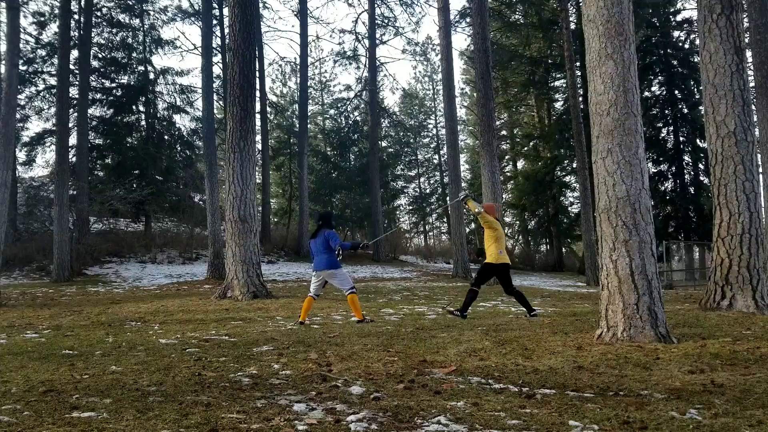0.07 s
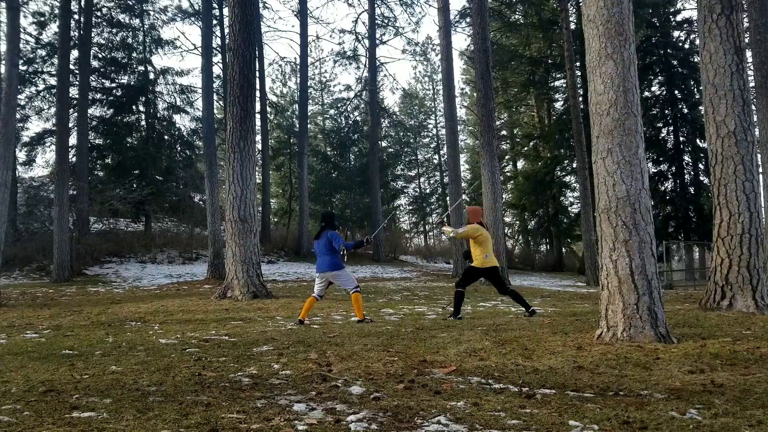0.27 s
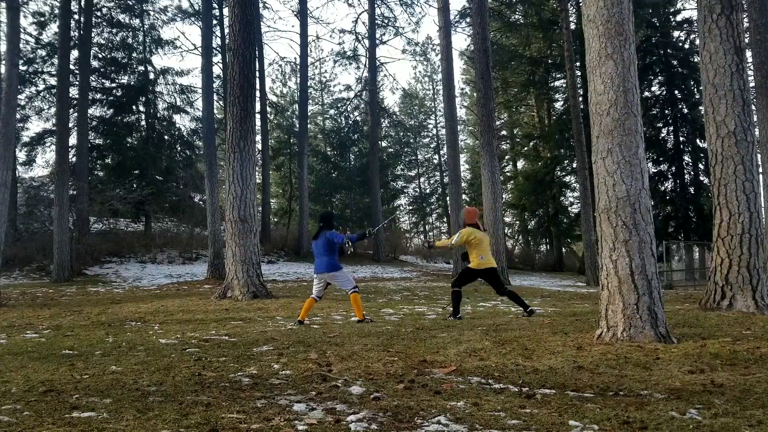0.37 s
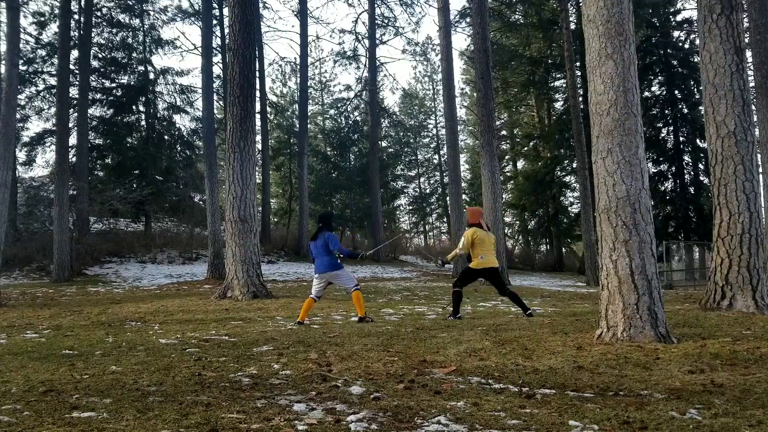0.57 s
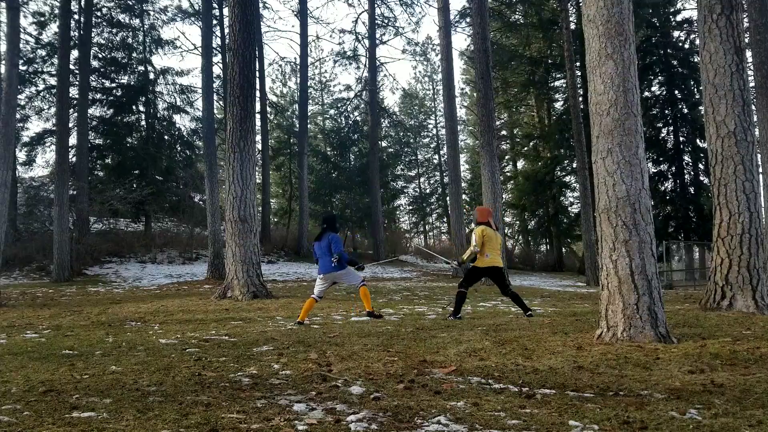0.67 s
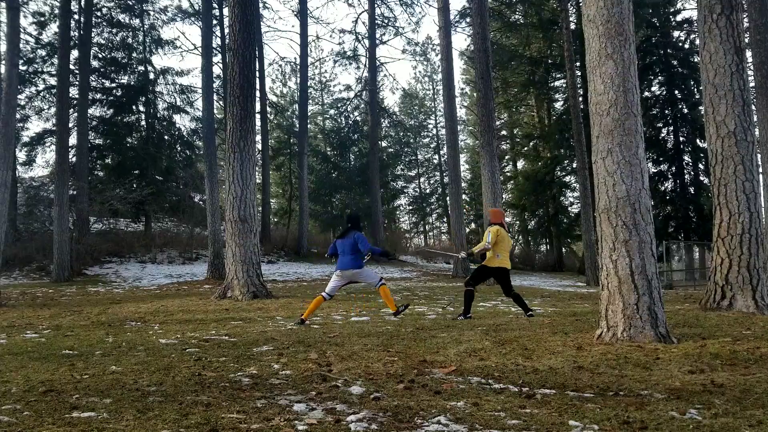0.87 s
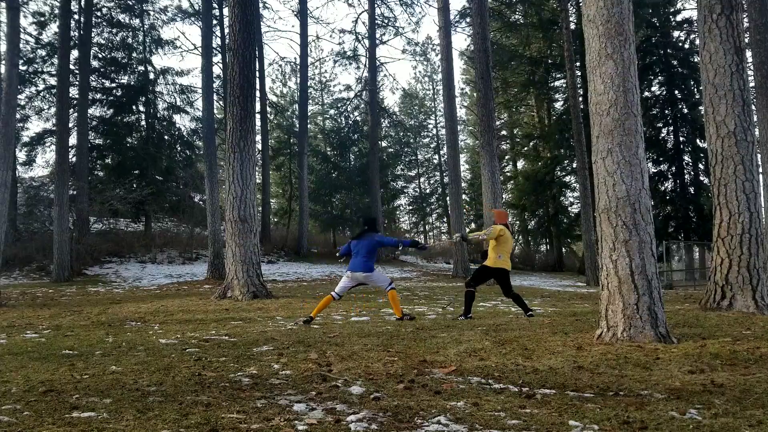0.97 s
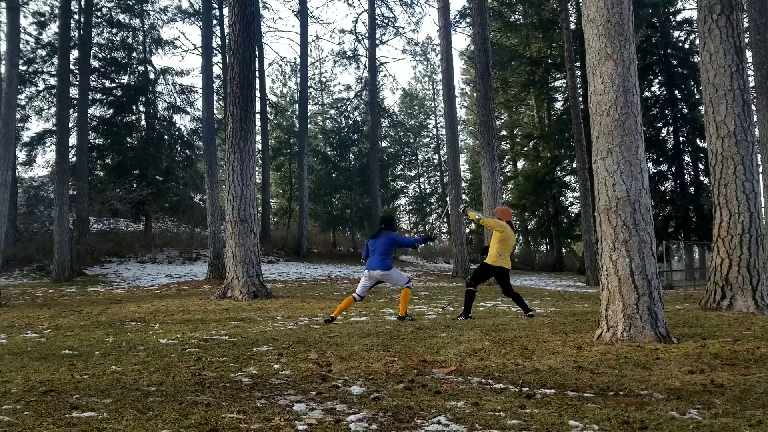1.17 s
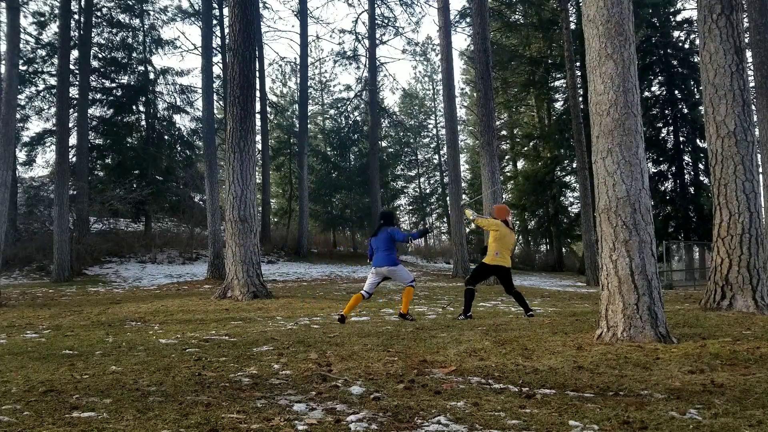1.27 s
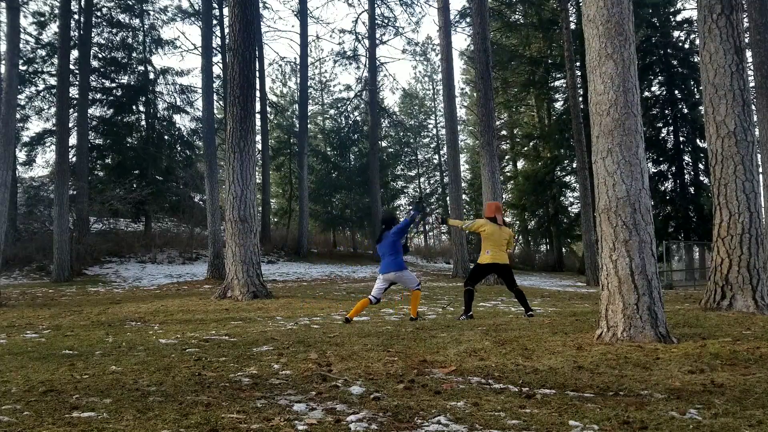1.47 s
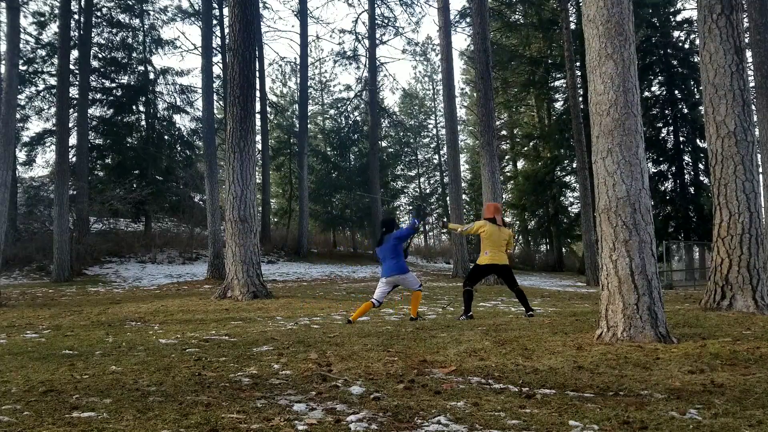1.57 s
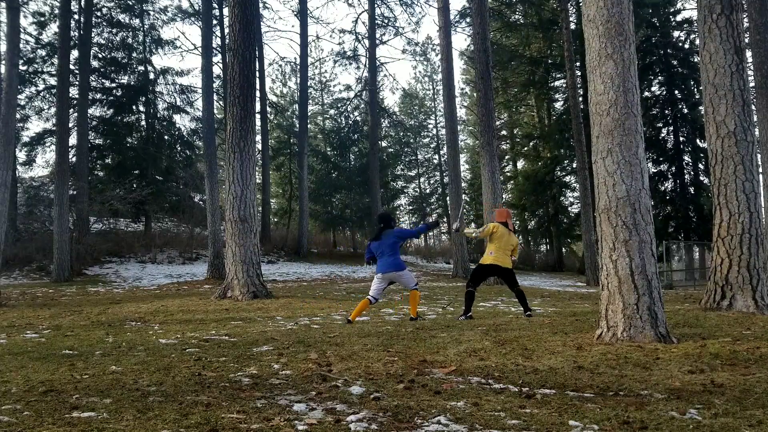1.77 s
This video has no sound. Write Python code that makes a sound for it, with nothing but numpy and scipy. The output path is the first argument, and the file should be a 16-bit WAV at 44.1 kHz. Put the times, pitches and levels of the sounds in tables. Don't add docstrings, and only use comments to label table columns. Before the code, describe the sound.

Blunt steel swords clash outdoors: one hard ringing clack, a faint tap, then a rapid clattering bind, with dull footfalls on turf, small gear ticks, a soft woodland tail and low traffic rumble, heard from several metres.

```python
import sys
import numpy as np
from scipy import signal
from scipy.fft import rfft, irfft, next_fast_len
from scipy.io import wavfile
from scipy.ndimage import uniform_filter1d, map_coordinates

SR = 44100
rng = np.random.default_rng(int(sys.argv[2]) if len(sys.argv) > 2 else 0)


def persist_wave(psi):
    counts = np.round(np.clip(psi, -1, 1) * 32767).astype(np.int16)
    wavfile.write(sys.argv[1], SR, np.atleast_2d(counts).T)


def voltage_ratio(decibels):
    exponent = np.asarray(decibels, float) / 20
    return 10 ** exponent


N = 81585


def unit(x):
    return x / np.sqrt(np.mean(x ** 2) + 1e-20)


def along(points, hz):
    f, value = np.transpose(points)
    return np.interp(np.log(hz + 1), np.log(f + 1), value)


def wobble(rate):
    knots = rng.standard_normal(int(N * rate / SR) + 4)
    return map_coordinates(knots, [np.arange(N) * rate / SR])


def filtered(x, response):
    m = next_fast_len(x.shape[-1] + 8192)
    spectrum = rfft(x, m) * response(np.fft.rfftfreq(m, 1 / SR))
    return irfft(spectrum, m)[..., :x.shape[-1]]


def add(track, sound, s):
    at = round(s * SR)
    track[at:at + len(sound)] += sound[:len(track) - at]


def ports(x, lean, lead=((1, 0), (2, 0))):
    side = np.array([[.5], [-.5]])
    return filtered(x, lambda hz: voltage_ratio(side * along(lean, hz)) * np.exp(1j * side * along(lead, hz)))


def swell(t, length):
    return t / length * 3 * np.exp(1 - t / length * 3)


# f/Hz, level/dB per Hz
SNAP_COLOUR = [(200, -40), (600, -11), (1400, -4.5), (4200, -4), (9000, -9.5), (14300, -9.5), (15500, -26)]
# f/Hz, level/dB per Hz
CRACK_COLOUR = [(200, -46), (700, -23.5), (1800, -19), (3000, -5.5), (4200, 0.5), (9000, -7), (14300, -4.5),
                (15500, -20.5)]
CRACK_T60_S = .03
SNAP_DB = 28.5


def clash(modes, hits, longest=.075, waver=1.2):
    out, t = np.zeros((3, N)), np.arange(SR // 2) / SR
    for s, db, grind, crack_db in hits:
        gain = voltage_ratio(db + 2.5) * (1 - np.exp(-(t / grind * 2) ** 2))
        ring = np.zeros(len(t))
        for hz, level, t60 in modes:
            walk = np.cumsum(rng.standard_normal(len(t))) / np.sqrt(SR / 100)
            phase = 7 * rng.random() + waver * walk
            decay = voltage_ratio(level + rng.normal(0, 1) - 60 * t / min(t60, longest))
            ring += decay * np.sin(2 * np.pi * hz * t + phase)
        noise = filtered(rng.standard_normal(len(t)), lambda hz: voltage_ratio(along(CRACK_COLOUR, hz)))
        crack = unit(noise) * voltage_ratio(crack_db - 60 * t / CRACK_T60_S)
        add(out[0], gain * ring, s)
        add(out[1], gain * crack, s)
    s, db, grind, crack_db = max(hits, key=lambda hit: hit[1])
    add(out[2], voltage_ratio([db + crack_db + SNAP_DB]), s + grind / 2)
    out[2] = filtered(out[2], lambda hz: voltage_ratio(along(SNAP_COLOUR, hz)))
    return out


# f/Hz, level/dB, time to fade 60 dB/s
PARRY_BLADE = [(3003, -12, 0.023), (4560, -10, 0.024), (3235, -12, 0.039), (3665, -7, 0.065),
               (3940, 0.5, 0.012), (4220, 3, 0.018), (4406, -18.5, 0.12), (5440, -22.5, 0.051),
               (7000, -9.5, 0.049), (8340, -16, 0.026), (11420, 4.5, 0.0077)]
PARRY_HILT = [(209.4, -7, 0.084), (350, -14.5, 0.047), (593.5, -10, 0.037), (819, -13.5, .05),
              (1114, -11.5, 0.063), (1280, 0, 0.034), (1540, 1, 0.02), (2014, 0, 0.026), (2408, -4, 0.032)]
PARRY_HUM = [(2200, -5, .5), (3060, 4, 0.93), (3400, 1.5, .5), (4200, -1, .45), (5050, -7, .4),
             (5440, -2, 0.65)]
# t/s, level/dB, grind/s, crack over ring/dB
PARRY_HITS = [
    (0.4681, -31, 0.00076, 1.5),
    (.4699, -21, .001, -1),
    (0.4741, -36, 0.0028, -2.5),
    (.477, -35.5, 0.0013, 3),
    (.48, -34, 0.00087, 6),
    (.4882, -38, 0.0015, 1),
]
PARRY_JOLT = [(0.4683, -28, 0.0022, -32)]
HUM_HITS = [(0.473, -57, 0.037, -27)]


def parry():
    blade = clash(PARRY_BLADE, PARRY_HITS)
    hilt = clash(PARRY_HILT, PARRY_JOLT)
    return blade + hilt + clash(PARRY_HUM, HUM_HITS, longest=.9, waver=2.6)


# f/Hz, level/dB, time to fade 60 dB/s
TAP_BLADE = [(990, 2.7, 0.047), (1259, 1.5, 0.049), (3025, 2, 0.025), (3680, -5, 0.019), (7600, 3, 0.043),
             (8520, -1, 0.03), (10650, 5, 0.019), (11800, 3.5, 0.04)]
# t/s, level/dB, grind/s, crack over ring/dB
TAP_HITS = [
    (1.0786, -46.5, 0.0019, 2.5),
    (1.0814, -45, 0.0032, 0.1),
    (1.096, -55, 0.00196, -1),
    (1.128, -60, 0.0051, -7),
]


def tap():
    return clash(TAP_BLADE, TAP_HITS)


# f/Hz, level/dB, time to fade 60 dB/s
BIND_BLADE = [(4730, -6, 0.029), (2840, -10.5, 0.021), (3500, -9, 0.019), (4250, -9, 0.041),
              (5460, -1, 0.017), (6070, 5.5, 0.016), (6530, 4.5, 0.014), (7990, -2.5, 0.033),
              (8670, -11, 0.057), (12800, -25, 0.026)]
BIND_HILT = [(551, -8, 0.052), (685, -12, 0.058), (878, -6, 0.05), (1130, -2.5, 0.026), (1784, 2.5, 0.023)]
SLIDE_BLADE = [(2900, -8, 0.027), (4200, -16, .025), (4610, -0.5, 0.026), (5130, -18, 0.027)]
RELEASE_BLADE = [(1203, 8, 0.017), (1754, -0.5, 0.027), (2750, -1, 0.018), (3510, -4, 0.024),
                 (6990, 3, 0.035), (7760, -7, 0.055)]
# t/s, level/dB, grind/s, crack over ring/dB
BIND_HITS = [
    (1.5373, -32.5, 0.00067, 3.5),
    (1.54, -27, .0016, -6.5),
    (1.5443, -46.5, .0016, -7),
]
BIND_JOLT = [(1.5372, -29, 0.0034, -42)]
SLIDE_HITS = [(1.552, -30.5, 0.0037, -1.7)]
RELEASE_HITS = [
    (1.5895, -38.5, 0.0042, 0),
    (1.594, -39.5, 0.0025, 1.1),
    (1.6, -47, 0.0041, 1.4),
]


def bind():
    crossing = clash(BIND_BLADE, BIND_HITS) + clash(BIND_HILT, BIND_JOLT)
    return crossing + clash(SLIDE_BLADE, SLIDE_HITS) + clash(RELEASE_BLADE, RELEASE_HITS)


# t/s, level/dB, length/s, centre f/Hz, width/octaves
GEAR = [(0.111, -74.5, 0.11, 7080, 2.7), (0.147, -64, 0.021, 12800, 0.5), (0.38, -60.5, 0.038, 8700, 4.5),
        (0.395, -61, 0.0038, 9000, 1.2), (0.401, -66, 0.0077, 8100, 1.8), (.429, -66.5, 0.0064, 4200, 0.14),
        (1.001, -62, 0.013, 2585, 0.52), (1.236, -58, .005, 13370, 0.2), (1.236, -67, 0.0033, 4330, 0.16),
        (1.26, -59, 0.0043, 13600, 0.075), (1.29, -57, 0.004, 14400, 0.06),
        (1.29, -59.5, 0.0051, 11400, .15), (1.291, -66, .004, 4770, .15), (1.291, -61, 0.0062, 8100, 1.8),
        (1.148, -72.5, 0.27, 7930, 3.3), (1.315, -76, 0.43, 10000, 1.9), (1.133, -62, 0.016, 4140, 0.6),
        (1.399, -66, 0.05, 9000, 2.3), (1.442, -67, 0.06, 9000, 4.1), (1.715, -57.5, 0.01, 3500, 0.9),
        (1.838, -54, 0.0057, 9900, 3.5)]
# t/s, level/dB, length/s, f/Hz
SCRAPES = [(0.151, -69, 0.027, 2790), (.152, -75, .015, 4010), (.153, -75, .015, 4800),
           (0.396, -65, 0.0089, 3760), (0.386, -80, .015, 4870), (0.374, -71.5, 0.021, 2730),
           (0.391, -71, 0.04, 2870), (0.385, -71, 0.017, 4100), (0.388, -63, 0.012, 5370),
           (0.387, -60.5, 0.0069, 8640), (1.284, -75.5, 0.079, 2870), (1.398, -68.5, 0.025, 4180),
           (1.401, -74, 0.036, 2910), (1.437, -73, 0.021, 4700), (1.472, -73, 0.034, 2850)]
SCRAPE_OCTAVES, GRAIN_DB = .04, 2


def gear():
    out, t = np.zeros(N), np.arange(SR // 2) / SR
    scrapes = [(*row, SCRAPE_OCTAVES) for row in SCRAPES]
    for s, db, length, hz, octaves in GEAR + scrapes:
        noise = rng.standard_normal(len(t))
        roughness = unit(uniform_filter1d(rng.standard_normal(len(t)), size=40))
        grains = noise * voltage_ratio(GRAIN_DB * roughness)
        band = filtered(grains, lambda f: np.exp(-(np.log2((f + 1) / hz) / octaves) ** 2))
        add(out, voltage_ratio(db) * unit(band) * swell(t, length), s)
    return out


# t/s, level/dB, length/s, from f/Hz, to f/Hz
SQUEAKS = [
    (1.231, -52, 0.0073, 11200, 13000),
    (1.235, -61, .016, 12500, 12700),
    (1.243, -67, 0.011, 11060, 10900),
]


def squeaks():
    out, t = np.zeros(N), np.arange(SR // 10) / SR
    for s, db, length, from_hz, to_hz in SQUEAKS:
        glide = from_hz + (to_hz - from_hz) * np.minimum(t / length, 1)
        hz = glide + 1800 * rng.standard_normal(len(t))
        add(out, voltage_ratio(db) * swell(t, length) * np.sin(2 * np.pi * np.cumsum(hz) / SR), s)
    return out


# t/s, peak level/dB, f/Hz, time to fade 60 dB/s
STAMPS = [
    (0.237, -34.5, 58, 0.086),
    (1.018, -35, 61.3, 0.11),
    (1.477, -24.5, 229, 0.028),
    (1.518, -31, 58.3, 0.2),
]
STAMP_RISE_S = 0.0097


def feet():
    out, t = np.zeros(N), np.arange(SR // 3) / SR
    for s, db, hz, t60 in STAMPS:
        envelope = voltage_ratio(db + 11.0 - 60 * t / t60) * (1 - np.exp(-t / STAMP_RISE_S))
        add(out, envelope * np.sin(2 * np.pi * hz * t), s)
    return out


# f/Hz, time to fade 60 dB/s
TREES_T60 = [(300, 0.17), (1500, 0.89), (4000, 0.82), (8000, 0.51), (15000, 0.42)]
# f/Hz, level/dB
TREES_COLOUR = [(300, 2), (1500, -4.5), (3000, 1), (4300, -2.5), (8000, 4.5), (15000, 2)]
# f/Hz, level/dB
TREES_LEAN = [(300, -10.5), (2400, -5), (4400, -7), (8100, 0.5)]
TREES_DB, TREES_GAP_S = -1.5, 0.031
TRUNKS_DB, TRUNKS_T60_S, TRUNKS_PER_S = 6.5, 0.11, 7000


def forest(x):
    hz, t, z = signal.stft(rng.standard_normal((2, SR)), SR, nperseg=256)
    fade = along(TREES_COLOUR, hz)[:, None] - 60 * t / along(TREES_T60, hz)[:, None]
    tail = signal.istft(z * voltage_ratio(fade), SR, nperseg=256)[1][:, :SR]
    t = np.arange(SR) / SR
    tail *= 1 - np.exp(-t / TREES_GAP_S)
    echoes = rng.standard_normal((2, SR)) * (rng.random((2, SR)) < TRUNKS_PER_S / SR)
    near = echoes * voltage_ratio(-60 * t / TRUNKS_T60_S)
    answer = voltage_ratio(TREES_DB) * tail / np.linalg.norm(tail[0])
    answer += voltage_ratio(TRUNKS_DB) * near / np.linalg.norm(near[0])
    return ports(signal.fftconvolve(x[None], answer, axes=1)[:, :N], TREES_LEAN)


# f/Hz, likeness/0 to 1
ALIKE = [(60, 1), (250, 0.84), (500, 0.32), (1200, 0.15), (4000, 0.21), (12000, 0.16)]
# f/Hz, level/dB
FAR_LEAN = [(60, -3.5), (150, -3), (380, -4.5), (950, -6), (2380, -8.5), (5980, -9), (15000, -0.5)]


def rush(spectrum, patchy_db):
    z = signal.stft(rng.standard_normal((2, N)), nperseg=512)[2]
    patches = uniform_filter1d(rng.standard_normal(z.shape[1:]), size=6, axis=0)
    patches = unit(uniform_filter1d(patches, size=14, axis=1))
    pair = signal.istft(z * voltage_ratio(patchy_db * patches), nperseg=512)[1][:, :N]

    def mid_side(hz):
        turn = np.arccos(np.clip(along(ALIKE, hz), -1, 1)) / 2
        return voltage_ratio(along(spectrum, hz)) * [np.cos(turn), np.sin(turn)]

    mid, side = filtered(pair, mid_side)
    both = ports(np.array([mid + side, mid - side]), FAR_LEAN)
    return both / np.sqrt(np.mean(both.mean(axis=0) ** 2))


# f/Hz, level/dB per Hz
RUMBLE = [(12, -50), (20, -14.5), (59, -1), (124, -4.5), (183, -9), (212, -8), (279, -16.5), (385, -26),
          (650, -30.5), (840, -66), (1430, -120)]
TYRES = [(260, -53.5), (450, -24.5), (616, -14.5), (717, -4.5), (799, -1), (1140, -2.5), (2240, -16.5),
         (2720, -26.5), (6000, -40), (7800, -87.5), (13200, -120)]
HISS = [(2650, -44.5), (4500, -6), (8620, -28.5), (8750, -28.5), (10600, -2), (14000, 2), (15000, -8.5)]
RUMBLE_DB, TYRES_DB, HISS_DB = -41.5, -56, -79


def background():
    rumble = voltage_ratio(RUMBLE_DB + 0.36 * wobble(0.5)) * rush(RUMBLE, patchy_db=-0.5)
    tyres = voltage_ratio(TYRES_DB + .4 * wobble(2.5)) * rush(TYRES, patchy_db=.6)
    return rumble + tyres + voltage_ratio(HISS_DB) * rush(HISS, patchy_db=-3.0)


# f/Hz, level/dB
NEAR_LEAN = [(60, -3.5), (400, -2), (700, -4.5), (2400, -12), (4400, -16.5), (8100, 9), (15000, -9)]
# f/Hz, phase/radians
NEAR_LEAD = [(100, -.1), (2000, 0), (4500, .4), (5600, 1.1), (6600, -.7), (9000, -.3), (11500, -1.9),
             (15000, -2.1)]
GEAR_TO_TREES_DB = -17


def scene():
    kit = gear() + squeaks()
    direct = kit + feet()
    wood = voltage_ratio(GEAR_TO_TREES_DB) * forest(kit)
    for (ring, crack, snap), ring_to_trees_db in [(parry(), -19), (tap(), -24), (bind(), -19)]:
        direct += ring + crack
        wood += forest(voltage_ratio(ring_to_trees_db) * ring + snap)
    return ports(direct, NEAR_LEAN, NEAR_LEAD) + wood + background()


def roll_off(x):
    return signal.sosfilt(signal.butter(12, 15950, fs=SR, output="sos"), x)


LOW_HZ, TOP_HZ, CEILING = 34, 14850, .7
DIP_HZ, DIP_WIDTH_HZ, DIP_DB = 6080, 330, -4


def record(dry):
    def camera(hz):
        band = (.03 + 1 / (1 + (hz / TOP_HZ) ** 70)) / (1 + (LOW_HZ / (hz + 1)) ** 4)
        return band * voltage_ratio(DIP_DB * np.exp(-((hz - DIP_HZ) / DIP_WIDTH_HZ) ** 2))

    soft = dry / (1 + np.abs(dry / CEILING) ** 4) ** (1 / 4)
    return roll_off(filtered(soft, camera))


dry = scene()
out = record(dry)
persist_wave(out)
```